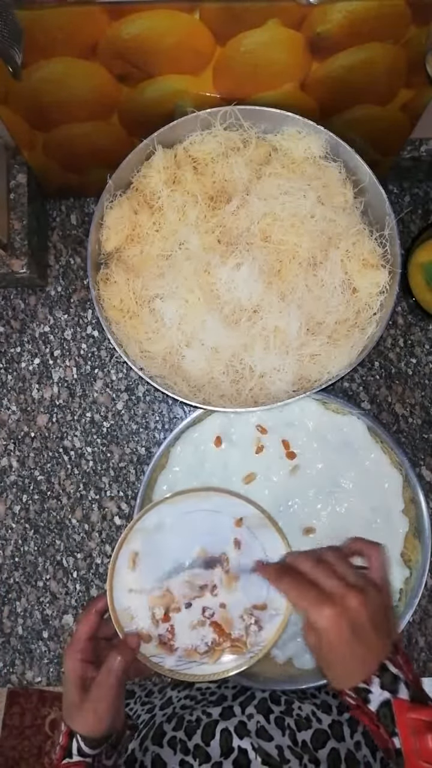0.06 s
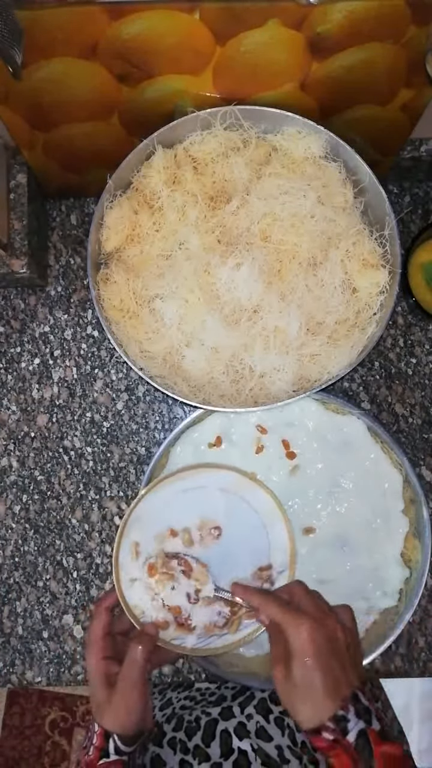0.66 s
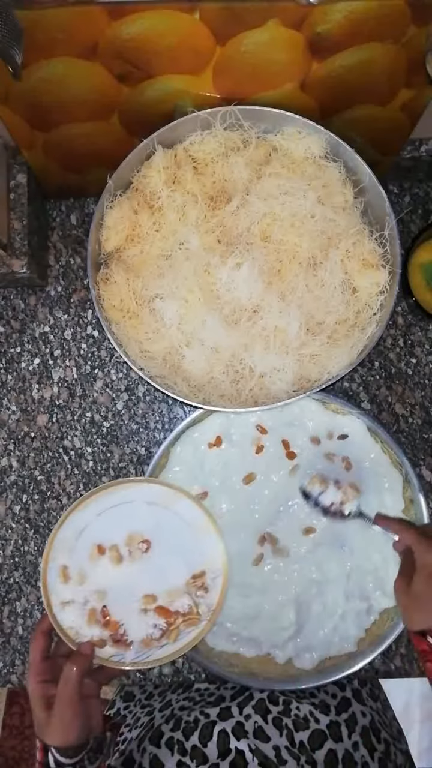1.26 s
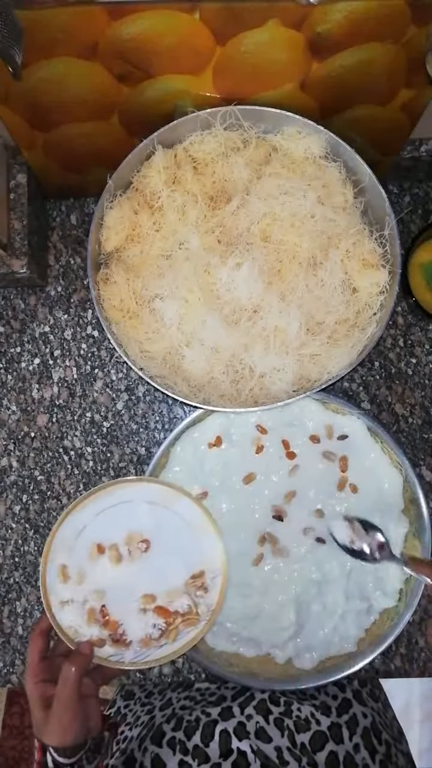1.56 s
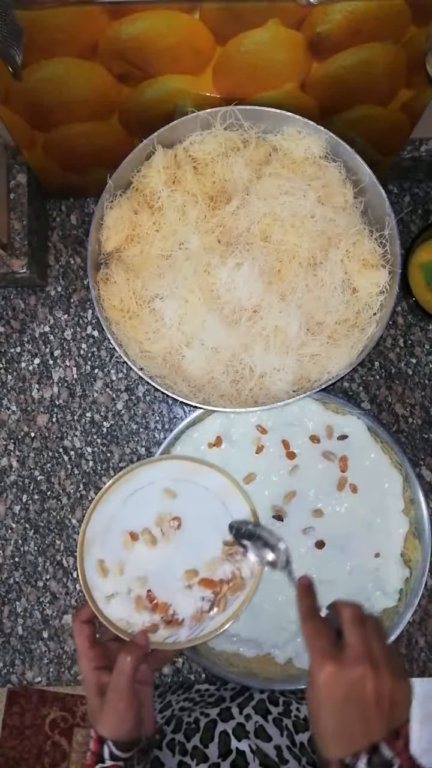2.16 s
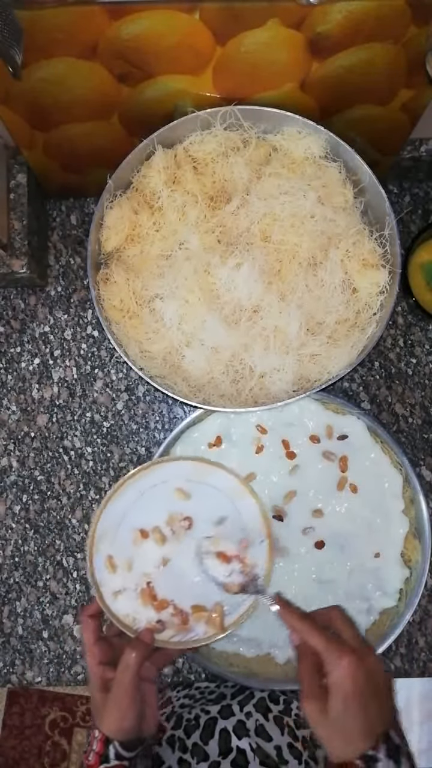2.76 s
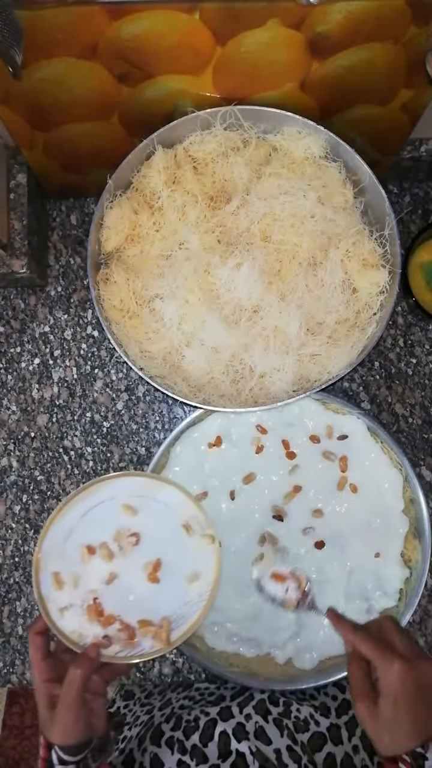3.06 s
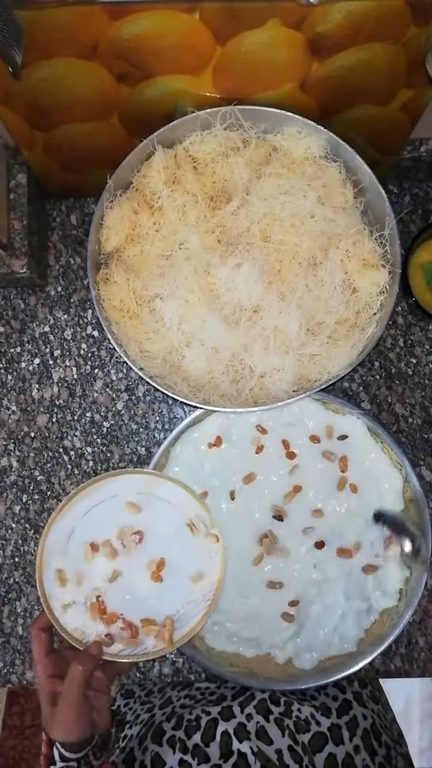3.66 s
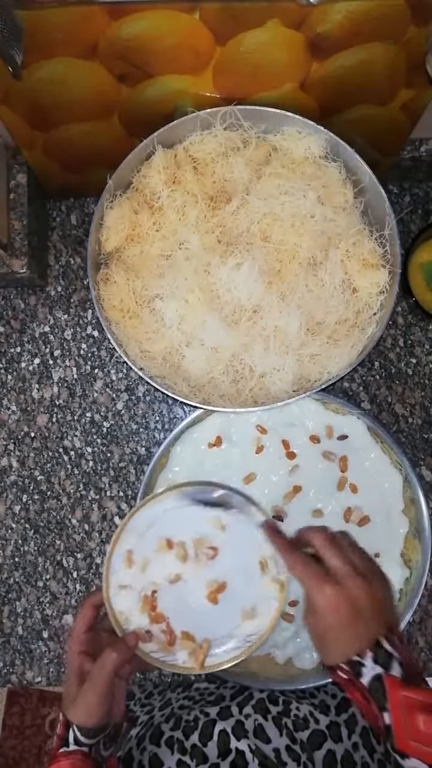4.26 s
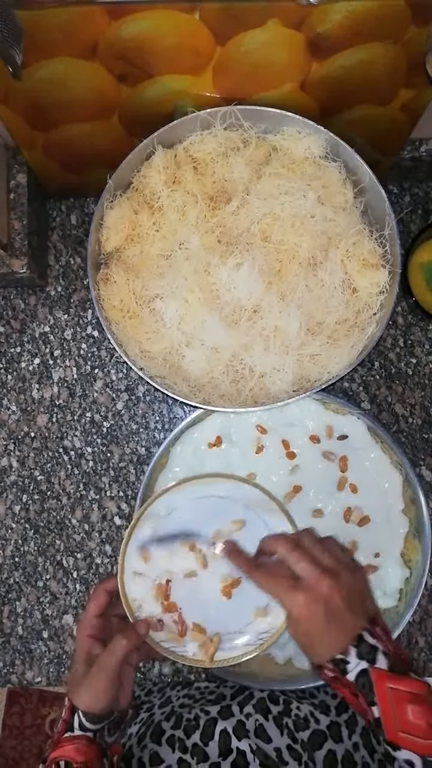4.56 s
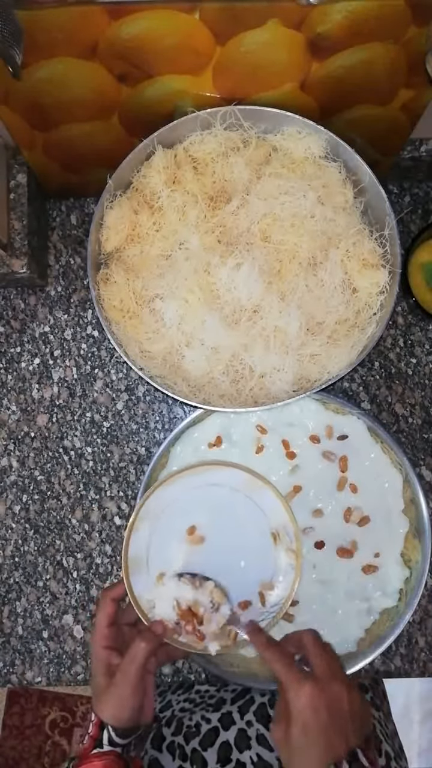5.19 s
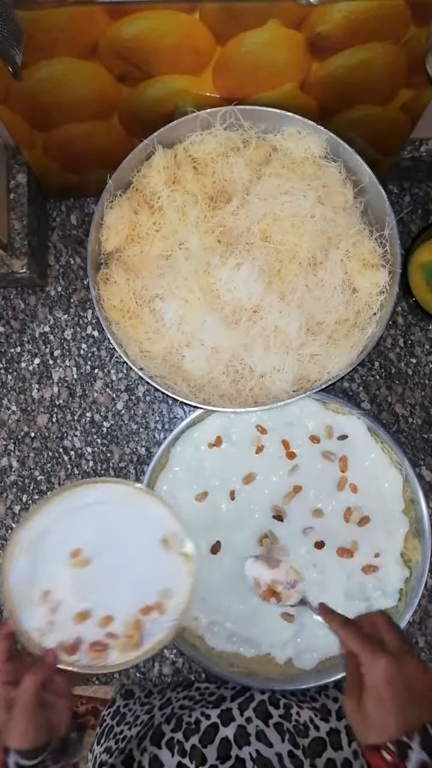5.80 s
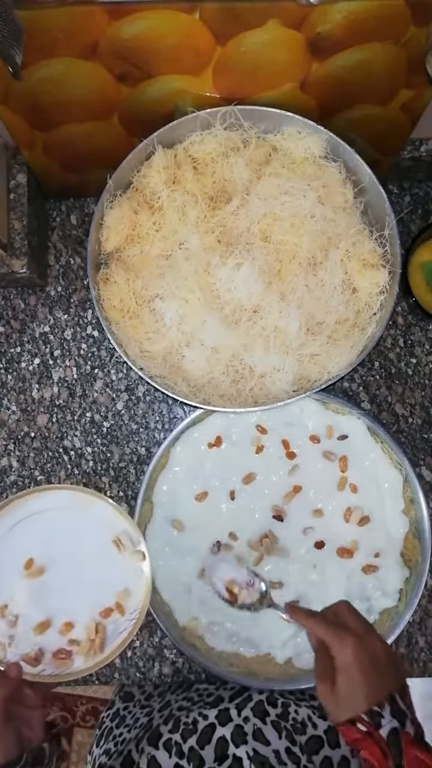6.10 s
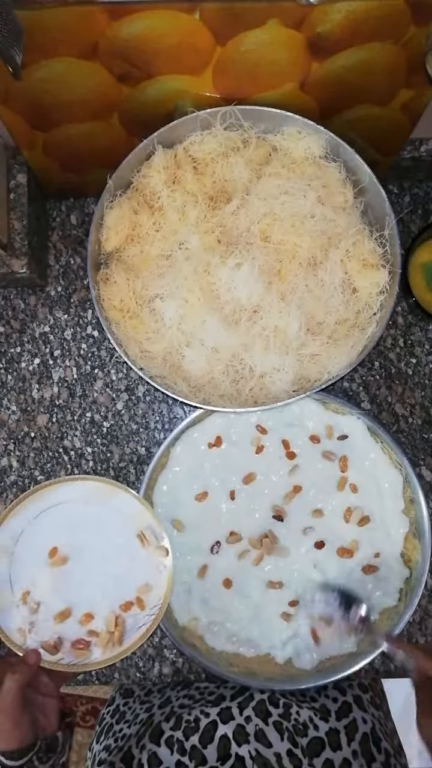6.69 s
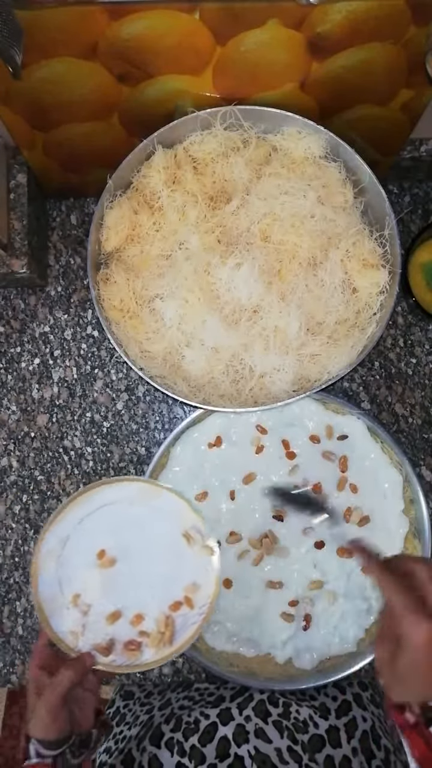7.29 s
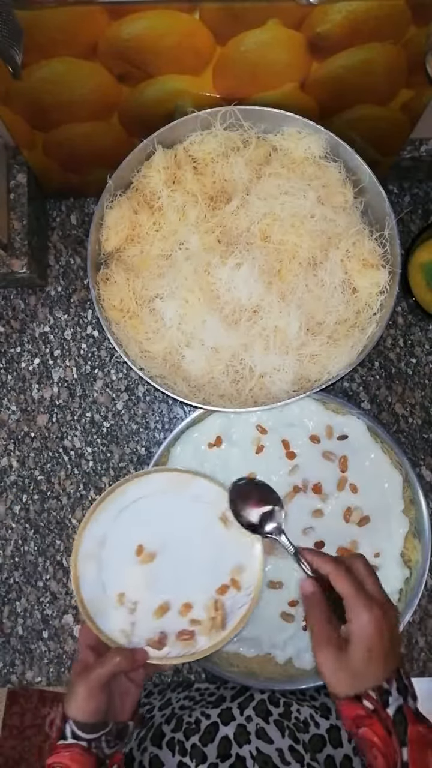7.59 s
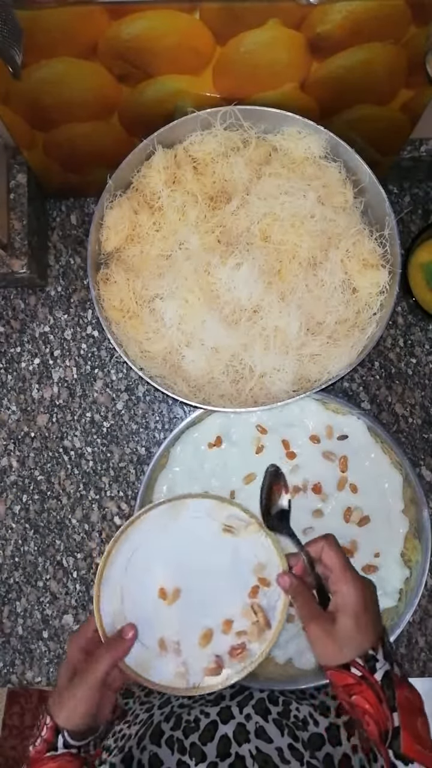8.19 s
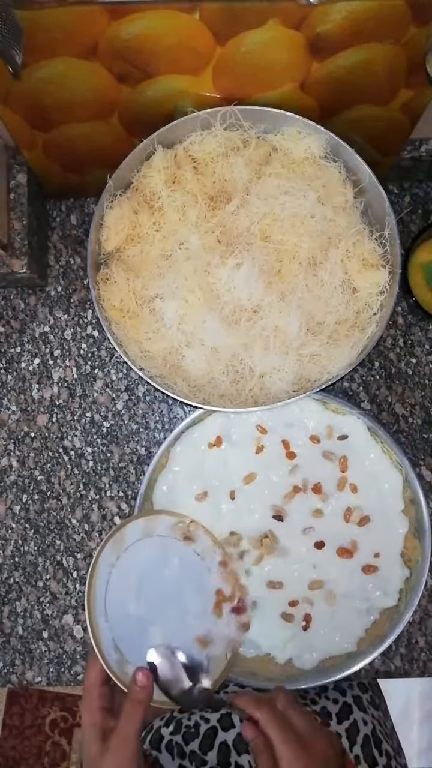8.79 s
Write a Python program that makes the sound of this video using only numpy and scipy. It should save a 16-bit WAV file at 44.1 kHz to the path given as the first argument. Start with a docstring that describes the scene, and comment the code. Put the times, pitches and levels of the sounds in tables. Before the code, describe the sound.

Heard from close above in a small kitchen, a spoon scoops from a dish with quick, bright clinks and rasping scrapes. It moves to a baking tray with a slightly different ring, and two light thuds come as the tray knocks the counter. More uneven clinking and scraping follows, mostly on the dish. A low room rumble and faint hiss continue underneath.

```python
"""A metal spoon scoops thick pudding in a bowl and spreads it on a baking tray, in a small kitchen.
The spoon lands with a clink and drags on as a gritty scrape made of many tiny slips; both ring the
dish that they touch. Twice the tray bumps the counter, and one light knock rings a low note.
A pair of microphones close above also hears the walls' short echo and the room's soft rumble."""
import sys
import numpy as np
from scipy import signal
from scipy.fft import rfft, irfft, next_fast_len
from scipy.io import wavfile

SR = 44100
rng = np.random.default_rng(int(sys.argv[2]) if len(sys.argv) > 2 else 0)


def transcribe(u):
    """Save the signal u as a 16-bit wav file named by the first command-line argument.

    u: samples, shape (n,) or (channels, n), limited to [-1, 1]; the rate is SR.
    q: integer samples, one column per channel.
    """
    v = np.clip(np.atleast_2d(u).T, -1, 1)
    q = np.round(v * 32767).astype(np.int16)
    wavfile.write(sys.argv[1], SR, q)


N = 390285
RING_TIME = np.arange(int(.2 * SR)) / SR  # time axis of one ring [s]
SPOON_LOW_HZ, SPOON_HIGH_HZ = 5720, 10100  # the spoon's own two broad rings
LEAD_S = 0.002  # silence ahead of a ring, so that filters have room to spread it


def spoon_in_bowl():
    """The spoon clinks and scrapes as it scoops, and the bowl rings."""
    # landings; the last four levels are relative to the middle ring:
    # (time [s], middle ring [dB], dull knock [dB], low ring [dB], high ring [dB], tick [dB])
    landings = [(0.0942, -22, -17, -17.5, -3.5, -1), (0.4331, -45, -2, 0.5, -24, -9),
                (0.6233, -35, -26, -7, -5, -9.5), (0.7798, -25.5, -12.5, -8, -2, -3),
                (1.052, -39, -4.5, 6, -3.5, -6), (1.2802, -33, -13, -10.5, 9.5, 3.5),
                (1.6204, -27.5, -17, 4, 1.5, 1.5), (1.8666, -25, -26, 4.5, -1.5, 1),
                (1.979, -32.5, -5, 3.5, 6.5, 6), (2.1975, -31.5, -10.5, 2, 11.5, 9.5),
                (2.3327, -42, -24, 4, -11, -21), (2.5066, -22.5, -37, -6, -5.5, -9.5),
                (2.5933, -47.5, 0.5, 10.5, 5, 15), (2.7503, -43.5, -26, 0.5, -16, -18),
                (2.831, -36.5, -27, -4, -8, 0), (2.9896, -30, -28, 1.5, 6.5, -1),
                (3.0463, -29, -15, 3.5, 3.5, 8), (5.1549, -31, -7.5, -19, -11, -13.5),
                (5.335, -32, -10, -8, -12, -3), (5.5286, -32.5, -13.5, -2.5, 11, 2.5),
                (5.6141, -39, -11, -4, 7, 4.5), (5.6752, -42.5, -28, -10, 16, 4),
                (6.1626, -37, -15, 4.5, -0.5, 8.5), (7.0013, -22.5, -28, -3.5, 1.5, -10),
                (7.1485, -34, -7, -10, 9.5, 1), (7.3847, -59, 6, 6, 0, 24),
                (7.4126, -43.5, -6, 1.5, 11, 16.5), (7.8089, -33, -18, -0.5, 4, 16),
                (8.1539, -24, -30.5, -16, -4.5, -11), (8.205, -30.5, -20, -8.5, 1.5, 13.5),
                (8.7555, -25, -21.5, -3.5, 1.5, 9.5)]
    # drags; the last two levels are relative to the middle ring:
    # (firmest moment [s], rise [s], fall [s], pressure [dB], grit [dB], low ring [dB], high ring [dB])
    strokes = [(0.19, 0.067, 0.053, -19.5, -26.5, -4.5, -5), (0.52, 0.079, 0.05, -19.5, -26.5, -3.5, -1.5),
               (0.87, 0.047, 0.18, -35.5, -39.5, -7.5, -5), (0.97, 0.061, 0.12, -28, -30, -2.5, -3),
               (1.395, 0.056, .045, -19.5, -26.5, -3, 3), (1.655, 0.021, 0.03, -18, -25.5, -1.5, -2.5),
               (1.97, .05, 0.041, -29, -43.5, -13, -1), (2.245, 0.036, 0.16, -37, -44, -2, -13),
               (2.34, 0.034, 0.026, -28, -44.5, -4.5, -1.5), (2.575, 0.048, 0.035, -26.5, -34, -14, -1.5),
               (2.825, 0.059, 0.042, -29.5, -35, -6.5, 3.5), (3.15, 0.057, 0.041, -31.5, -41, -4, 2.5),
               (5.29, 0.072, 0.044, -19.5, -33, -13.5, 6), (5.62, 0.049, 0.044, -29, -37.5, -9, 6.5),
               (5.71, 0.049, 0.093, -33, -37.5, -14.5, 0), (5.82, 0.061, 0.069, -32.5, -32, -1.5, -1),
               (5.94, 0.084, 0.029, -23.5, -33.5, 0, 0.5), (6.24, 0.063, 0.016, -23, -32, 2.5, 4),
               (7.075, 0.075, 0.12, -35, -40.5, -4.5, -15), (7.15, .04, .04, -21, -28.5, -5.5, -3),
               (7.57, 0.088, 0.084, -17.5, -25.5, -10.5, -5.5), (7.97, 0.079, 0.066, -17, -26.5, -11, 0),
               (8.43, 0.2, 0.17, -27.5, -25, -11, -2), (8.86, .07, .04, -28.5, -25.5, -3, 6)]
    # the bowl's natural notes: (pitch [Hz], level [dB], time to fade by 60 dB [s])
    notes = [(337, 5.5, 0.26), (630, 4, 0.086), (840, 6, 0.046), (1140, 2, 0.027), (1209, 20.5, 0.11),
             (1500, 0.5, 0.064), (1870, -7.5, 0.037), (2180, 1, 0.056), (2203, 2, 0.075),
             (2294, 16.5, 0.081), (2424, 3.5, 0.13), (3660, 21, 0.062), (4309, 11, 0.073),
             (5530, 2.5, 0.033), (5850, 5.5, 0.099), (6240, -2, 0.055), (6830, 2, 0.092), (8640, 5.5, 0.14),
             (9340, -3, 0.049)]
    # the pitch rises a little as the bowl empties: (time [s], pitch [factor])
    tuning = [(0, 0.98), (2.2, 0.97), (5.3, 1.0), (8.8, 0.99)]
    return clinks(landings, notes, tuning, gain_db=30) + scrapes(
        strokes, notes, tuning, body_db=-1, hiss_db=0.5, rustle_db=-42.5, ring_db=-6,
        pocket_hz=1009, pocket_db=2.5)


def spoon_on_tray():
    """The spoon clinks and scrapes as it spreads the pudding, and the tray rings."""
    # landings, as in the bowl:
    # (time [s], middle ring [dB], dull knock [dB], low ring [dB], high ring [dB], tick [dB])
    landings = [(3.4739, -31.5, -13.5, -10.5, -0.5, 5), (3.8612, -22, -23.5, -14, -2, -1),
                (4.201, -22, -20.5, -3.5, -7, -1.5), (4.5382, -25, -18, -9.5, 1.5, 4.5),
                (4.8223, -20.5, -15.5, -10, -5, 0.5), (6.3311, -40, -18, -23, -12, -10),
                (6.5348, -50.5, 6, 4.5, -40, -8.5)]
    # drags, as in the bowl:
    # (firmest moment [s], rise [s], fall [s], pressure [dB], grit [dB], low ring [dB], high ring [dB])
    strokes = [(3.645, .045, 0.033, -32, -36.5, -11, -1), (3.995, 0.079, 0.036, -29, -36, -15.5, 1),
               (4.35, 0.13, 0.059, -22.5, -31.5, -12.5, 2.5), (4.625, 0.062, 0.044, -28.5, -28.5, -2.5, 3),
               (4.85, .02, 0.07, -26, -40, 3, -7), (6.345, 0.032, 0.029, -35, -42, -22, -2.5),
               (6.665, 0.074, 0.047, -27, -38.5, -19, -5)]
    # the tray's natural notes: (pitch [Hz], level [dB], time to fade by 60 dB [s])
    notes = [(927.6, 18.3, 0.26), (1174.5, 12.8, 0.24), (1643, 14.4, 0.035), (1864, 2.1, 0.54),
             (1930, 13, 0.077), (2304, 7.5, 0.034), (2742, 17.4, 0.041), (3113, 18, 0.075),
             (3554, 7, 0.071), (3778, 19.4, 0.064), (5050, 12, 0.095), (5250, 1.8, 0.028),
             (5600, 6.2, 0.26), (6080, 7.2, 0.065), (7230, 2.3, 0.2)]
    steady = [(0, 1)]
    return clinks(landings, notes, steady, gain_db=32.5) + scrapes(
        strokes, notes, steady, body_db=2.64, hiss_db=5.5, rustle_db=-50.5, ring_db=-6.5,
        pocket_hz=906, pocket_db=1)


def clinks(landings, notes, tuning, gain_db, spoon_db=4.5, spoon_width_hz=900, cushion_s=0.00087):
    """Each landing rings the dish and the hand-held spoon, and ends in a short skid."""
    out = np.zeros((2, N))
    for start, db, knock_db, low_db, high_db, tick_db in landings:
        loudest_db = max(low_db, 0, high_db)
        # a soft landing with little tick gives a purer ring
        pure_db = np.clip(loudest_db - tick_db, 0, 20) - 3
        ring = dish_ring(notes, at_time(tuning, start), pure_db)
        # the film of pudding cushions the first instant
        ring = delayed(ring * (1 - np.exp(-RING_TIME / cushion_s)))
        ring += crack()[:, :ring.shape[1]]
        # a hard landing wakes the spoon's upper ring, a soft one its lower
        hardness = np.clip(.5 + (tick_db - loudest_db) / 20, 0, 1)
        for hz, share in ((SPOON_LOW_HZ, 1 - hardness), (SPOON_HIGH_HZ, hardness)):
            ring = shaped(ring, lambda f: share * spoon_db / (1 + ((f - hz) / spoon_width_hz) ** 2))
        ring = contact_spot(ring, db + np.array([knock_db, low_db, 0, high_db, tick_db]))
        skid_db = -43 - 168 * RING_TIME
        force = friction(len(RING_TIME)) * amp(skid_db) * (RING_TIME < 0.13)
        force[0] = 1  # the landing itself
        add(out, start - LEAD_S, amp(gain_db) * signal.fftconvolve([force], ring, axes=1))
    return out


def crack(db=-5.5, fade_s=0.00093, low_edge_hz=7040):
    """The first instant of metal on the dish is a tiny burst of bright noise."""
    burst = unit(rng.standard_normal((2, len(RING_TIME))) * np.exp(-RING_TIME / fade_s))
    return shaped(delayed(burst, 0.0025), lambda f: db - 20 * np.log10(1 + (low_edge_hz / (f + 1)) ** 2))


def scrapes(strokes, notes, tuning, body_db, hiss_db, rustle_db, ring_db, pocket_hz, pocket_db):
    """Tiny slips shake the dish, while the sliding spoon shortens its ring."""
    edge_s, echo, pocket_width_hz = 0.0038, 0.14, 380
    out = np.zeros((2, N))
    for firmest, rise, fall, pressure_db, grit_db, low_db, high_db in strokes:
        t = np.arange(-rise, fall, 1 / SR)
        lean_db = hand_pressure(t, rise, fall)
        body_gain = amp(pressure_db + lean_db + body_db)
        hiss_gain = amp(grit_db + 1.25 * lean_db + hiss_db)
        soft_ends = np.clip(np.minimum(t + rise, fall - t) / edge_s, 0, 1)
        slips = friction(SR // 2)[:len(t)] * soft_ends
        # the pocket of air under the spoon sounds lower as the spoon presses down
        pocket_pitch = pocket_hz * (1 - 0.038 * lean_db)
        # an echo across the pocket gives overtones that bend with it
        slips = (slips + echo * np.interp(t - 1 / pocket_pitch, t, slips)) / np.hypot(1, echo)
        pocket = resonate(resonate(slips, pocket_pitch, pocket_width_hz), pocket_pitch, pocket_width_hz)
        rub = slips + (amp(pocket_db) - 1) * pocket
        # the spoon's lower ring stands out and bends with the pressure
        whine = resonate(slips, SPOON_LOW_HZ * (1 - 0.021 * (lean_db - lean_db.mean())), width_hz=340)
        rasp = slips + (amp(3.5) - 1) * whine
        # the dull rustle in the lowest band hardly grows in a firmer stroke
        bands_db = [rustle_db - 0.82 * pressure_db, low_db, 0, high_db]
        # a gritty drag rasps; a smooth, firm one makes the dish sing
        smooth = np.pi / 2 * np.clip((pressure_db - grit_db + 0.12 * lean_db) / 12, 0, 1)
        for share, sing_db in ((np.cos(smooth), 0), (np.sin(smooth), 13)):
            ring = delayed(dish_ring(notes, at_time(tuning, firmest), ring_db + sing_db,
                                     damping=1.4, hold_s=0.0044, fade_s=0.0034))
            body_ring = unit(contact_spot(ring, bands_db))
            body = signal.fftconvolve([rub * share * body_gain], body_ring, axes=1)
            add(out, firmest - rise, body + gritty_hiss(rasp * share * hiss_gain, ring))
    return out


def gritty_hiss(force, ring):
    """The slips stir the highest part of the dish's ring into a hiss."""
    # tone of the hiss: (frequency [Hz], level [dB])
    tone = [(3500, -68), (5200, 0.5), (7000, -1.5), (10000, 0), (12500, -3), (14000, -1.5), (15500, -23)]
    return signal.fftconvolve([force], unit(shaped(ring, lambda f: at_hz(tone, f))), axes=1)


def hand_pressure(t, rise, fall, start_db=-18, end_db=-25, flatness=2.56):
    """The hand leans in and eases off: pressure in dB against the firmest moment, at t = 0."""
    return np.where(t < 0, start_db * abs(t / rise) ** flatness, end_db * abs(t / fall) ** flatness)


def friction(size, slips_per_s=2500, uneven_db=0.5, judder_db=4, judder_hz=110):
    """The spoon moves in tiny slips of uneven size, bunched by its judder."""
    slips = (rng.random(size) < slips_per_s / SR) * rng.choice([-1, 1], size)
    strength = amp(uneven_db * np.minimum(rng.exponential(1, size), 5))
    judder = np.interp(np.arange(size) * judder_hz / SR, np.arange(size), rng.standard_normal(size))
    return unit(slips * strength * amp(judder_db * judder)) * np.sqrt(size)


def dish_ring(notes, pitch=1, ring_db=0, damping=1, hold_s=0.0043, fade_s=0.0077, detune=0.0051):
    """A tapped object clatters for a few milliseconds, then its natural notes ring on."""
    t = RING_TIME
    clatter_fade = np.exp(-np.maximum(t - hold_s, 0) / fade_s - t / (2 * hold_s))
    out = unit(rng.standard_normal((2, len(t))) * clatter_fade)
    for hz, db, fade_60_s in notes:
        life_s = fade_60_s / damping / np.log(1000)
        # the higher the note, the more it is out of step between the microphones
        phase = rng.random() + rng.standard_normal((2, 1)) * hz / 7000
        cycles = hz * pitch * (1 + detune * rng.standard_normal()) * t + phase
        strength = amp(db + ring_db + rng.standard_normal()) * 2 / (life_s * SR)
        out += strength * np.exp(-t / life_s) * np.sin(2 * np.pi * cycles)
    return out


def contact_spot(ring, levels_db):
    """The spot that the spoon touches decides how loud each band of the ring is."""
    # borders of the knock, low, middle, high and tick bands: (frequency [Hz])
    edges = [250, 900, 1600, 3000, 5000, 16000]
    hz = np.fft.rfftfreq(ring.shape[1], 1 / SR)
    power = np.mean(abs(rfft(ring)) ** 2, 0) * 2 / ring.shape[1]
    gains = []
    for low, high, db in zip(edges, edges[1:], levels_db):
        gain_db = db - 10 * np.log10(power[(hz > low) & (hz < high)].sum())
        gains += [(low * 1.1, gain_db), (high / 1.1, gain_db)]
    below = [(edges[0] / 8, gains[0][1] - 70), (edges[0] / 2, gains[0][1] - 32)]
    above = [(high * 1.25, gains[-1][1] - 35)]
    return shaped(ring, lambda f: at_hz(below + gains + above, f))


def tray_bumps(gain_db=19, lead_s=0.005):
    """The heavy tray thuds on the counter, too low for the microphones to differ."""
    # bumps: (time [s], level [dB])
    bumps = [(4.665, -14.5), (4.866, -12.5)]
    # the counter's natural notes: (pitch [Hz], level [dB], time to fade by 60 dB [s])
    notes = [(266, 30.8, 0.096), (286, 17.4, 0.081), (425, 1.3, 0.22), (528, 13, 0.064), (657, 9.6, 0.15),
             (890, 7.8, 0.12), (1085, 3, 0.17)]
    # tone of a thud: (frequency [Hz], level [dB])
    tone = [(30, -65), (100, -32), (200, -5.5), (280, 1), (900, 10.5), (1600, -1), (3500, -30), (9000, -61)]
    out = np.zeros((2, N))
    for start, db in bumps:
        ring = delayed(dish_ring(notes), lead_s)
        thud = unit(shaped(ring, lambda f: at_hz(tone, f)))
        add(out, start - lead_s, amp(db + gain_db) * thud[[0, 0]])
    return out


def ping(start_s=5.335, hz=964, db=-30, fade_60_s=0.2):
    """One light knock sets a single low note of a dish ringing."""
    out = np.zeros((2, N))
    note = amp(db - 60 * RING_TIME / fade_60_s) * np.sin(2 * np.pi * hz * RING_TIME)
    add(out, start_s, note[None])
    return out


def kitchen_echo(dry, echo_db=-6, first_echo_s=0.00047, drift_hz=0.545):
    """Hard walls add dense echoes that die faster in the treble and shift as the hands move."""
    # how long the kitchen rings: (frequency [Hz], time to fade by 60 dB [s])
    fade_times = [(250, 0.34), (800, 0.32), (2000, 0.3), (5500, 0.28), (10000, 0.2), (15000, 0.19)]
    out = dry
    for place in range(3):
        hz, t, noise = signal.stft(rng.standard_normal((2, SR // 2)), SR, nperseg=256)
        tail = signal.istft(noise * amp(-60 * t / at_hz(fade_times, hz)[:, None]), SR)[1]
        tail *= np.clip(np.arange(tail.shape[1]) / SR / first_echo_s - 1, 0, 1)
        share = np.sqrt(2 / 3) * np.cos(np.pi * (drift_hz * np.arange(N) / SR + place / 3))
        out = out + amp(echo_db) * signal.oaconvolve(dry * share, unit(tail), axes=1)[:, :N]
    return out


def room_air(air_db=-50.5, drone_hz=640):
    """The room has a steady rumble and hiss, alike on both sides in the bass, and a faint drone."""
    # tone of the still room: (frequency [Hz], level [dB])
    tone = [(25, 7), (60, 1), (110, 7.5), (200, -4.5), (420, -11.5), (700, -22.5), (1200, -9.5),
            (2300, -14), (3500, -14.5), (5000, -20), (8000, -21), (11000, -17.5), (14000, -24),
            (15500, -30)]
    # how alike left and right are: (frequency [Hz], likeness [0 to 1])
    likeness = [(40, .998), (130, .97), (400, .6), (1000, .3), (3000, 0)]
    # the drone swells partway through: (time [s], level [dB])
    drone_levels = [(0, -69), (3.2, -65), (4, -53.5), (7, -54.5), (8.8, -55)]
    hz = np.fft.rfftfreq(N, 1 / SR)
    left, other = rfft(rng.standard_normal((2, N)))
    same = at_hz(likeness, hz)
    right = same * left + np.sqrt(1 - same ** 2) * other
    air = irfft(np.array([left, right]) * amp(at_hz(tone, hz)), N)
    drone = resonate(rng.standard_normal((2, N)), np.full(N, drone_hz), width_hz=70)
    drone_db = at_time(drone_levels, np.arange(N) / SR)
    return np.sqrt(N) * (amp(air_db) * unit(air) + amp(drone_db) * unit(drone))


def amp(db):
    """Turns decibels into a gain."""
    return 10 ** (np.asarray(db) / 20)


def unit(x):
    """Scales each channel to an energy of one."""
    return x / np.sqrt(np.sum(x ** 2, -1, keepdims=True) + 1e-20)


def at_hz(points, hz):
    """Reads a table at a frequency, with octaves evenly spaced."""
    f, value = np.transpose(points)
    return np.interp(np.log(hz + 1), np.log(f + 1), value)


def at_time(points, seconds):
    """Reads a table at a time."""
    return np.interp(seconds, *np.transpose(points))


def shaped(x, curve):
    """Filters x by a curve that gives dB for each frequency."""
    size = next_fast_len(x.shape[-1] + 2048)
    gain = amp(curve(np.fft.rfftfreq(size, 1 / SR)))
    return irfft(rfft(x, size) * gain, size)[..., :x.shape[-1]]


def resonate(x, hz, width_hz):
    """Keeps a narrow band of x around the moving pitch hz."""
    turn = np.exp(2j * np.pi * np.cumsum(hz) / SR)
    decay = np.exp(-np.pi * width_hz / SR)
    return 2 * (turn * signal.lfilter([1 - decay], [1, -decay], x / turn)).real


def delayed(sound, seconds=LEAD_S):
    """Puts silence ahead of a sound."""
    return np.pad(sound, ((0, 0), (int(seconds * SR), 0)))


def add(mix, start_s, sound):
    """Mixes a sound in at a given time."""
    part = mix[:, max(round(start_s * SR), 0):][:, :sound.shape[1]]
    part += sound[:, :part.shape[1]]


def scene():
    """Bowl and tray in the kitchen; the right microphone faces the treble, the left the middle range."""
    # balance of the microphones: (frequency [Hz], left minus right [dB])
    balance = [(250, -2.5), (700, 3), (2000, 2), (3800, 0), (6500, 1), (9500, -8.5), (13000, -15.5)]
    dishes = kitchen_echo(spoon_in_bowl() + spoon_on_tray() + tray_bumps() + ping())
    sides = np.array([[-1], [1]])
    panned = shaped(dishes, lambda f: 10 * np.log10(2 / (1 + amp(sides * at_hz(balance, f)) ** 2)))
    return panned + room_air()


def record(dry):
    """The microphones dull the top treble; peaks are clipped and the very highest sound is cut off."""
    # the microphones' treble loss: (frequency [Hz], level [dB])
    treble_loss = [(12000, -1.5), (13800, -11), (15000, -18), (16000, -33)]
    heard = np.clip(shaped(dry, lambda f: at_hz(treble_loss, f)), -1, 1)
    treble_cut = signal.firwin(511, cutoff=16400, window=("kaiser", 9), fs=SR)
    return signal.oaconvolve(heard, treble_cut[None], "same")


dry = scene()
out = record(dry)
transcribe(out)
```